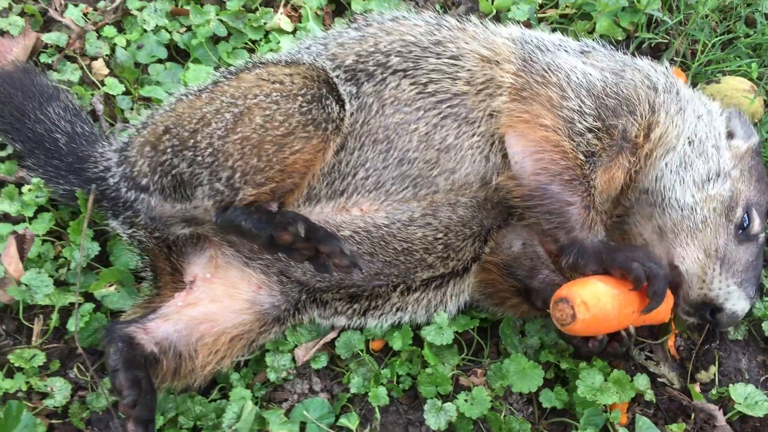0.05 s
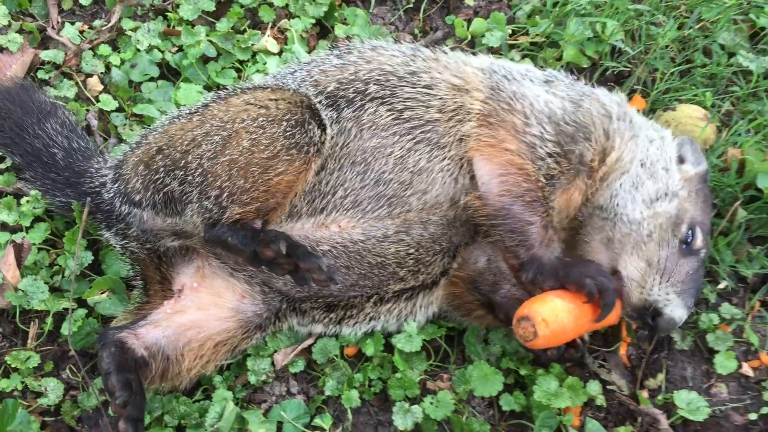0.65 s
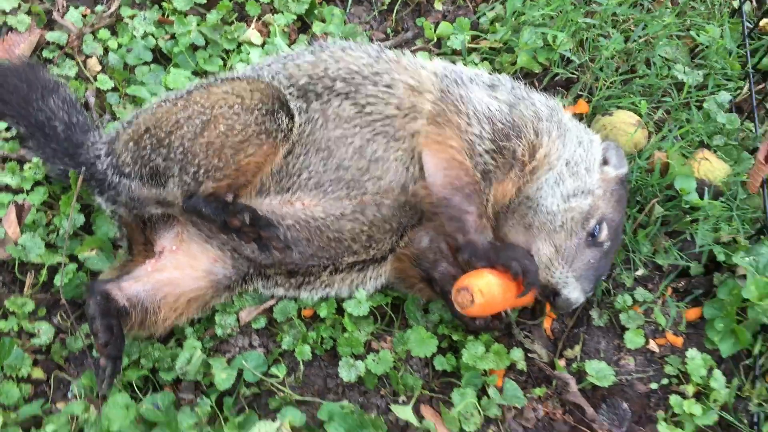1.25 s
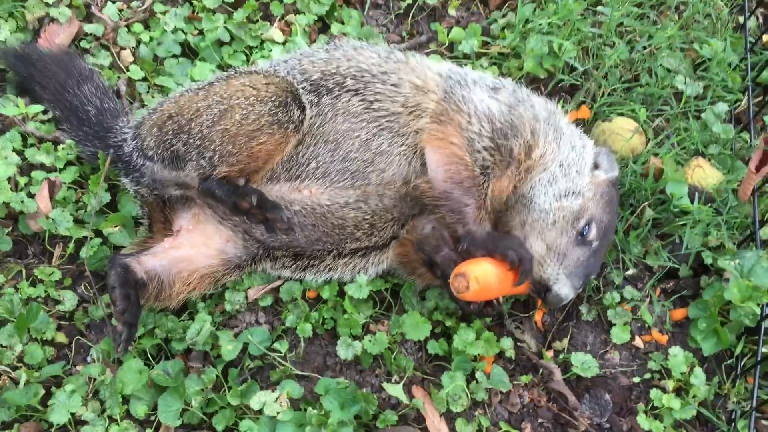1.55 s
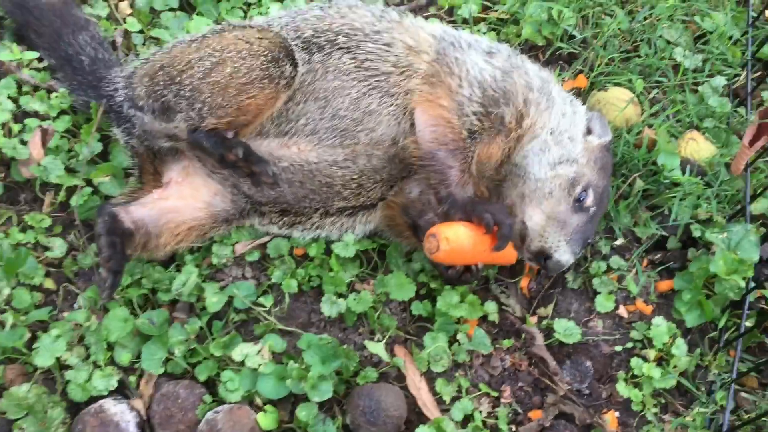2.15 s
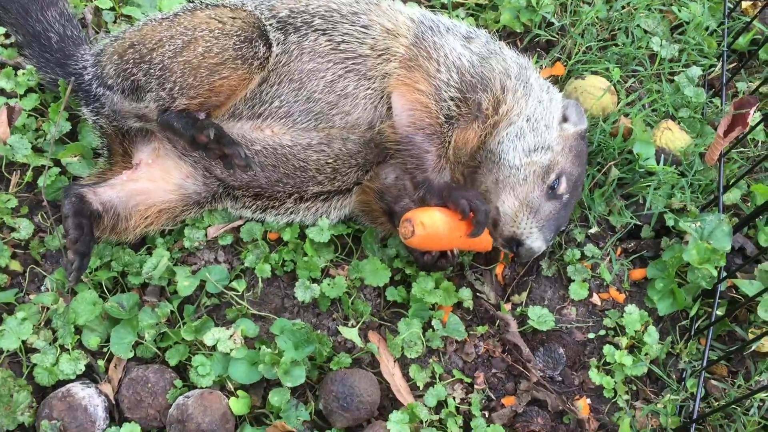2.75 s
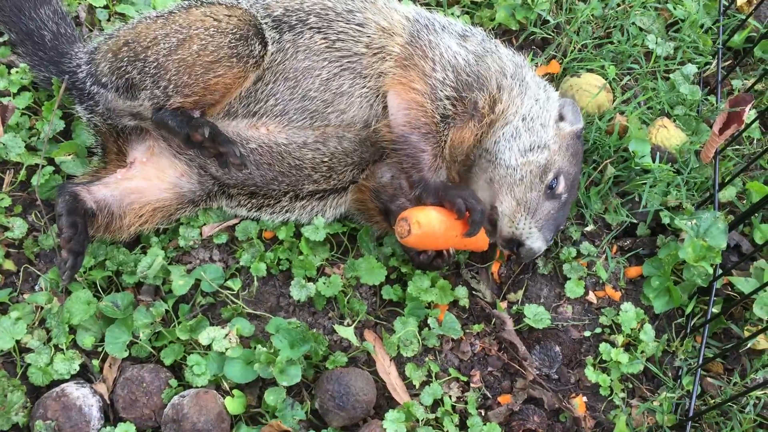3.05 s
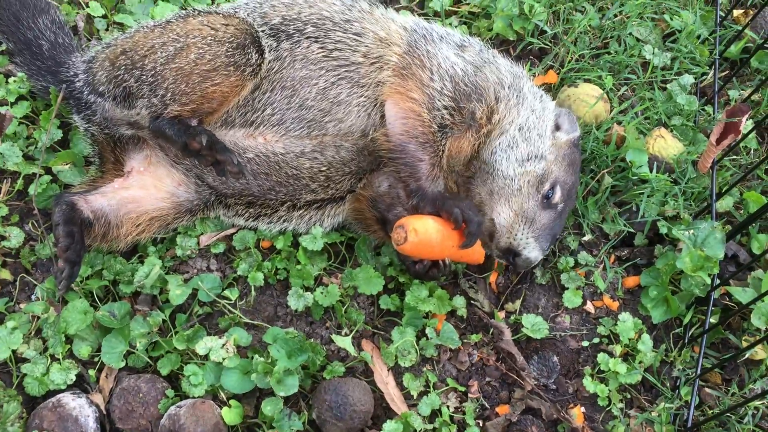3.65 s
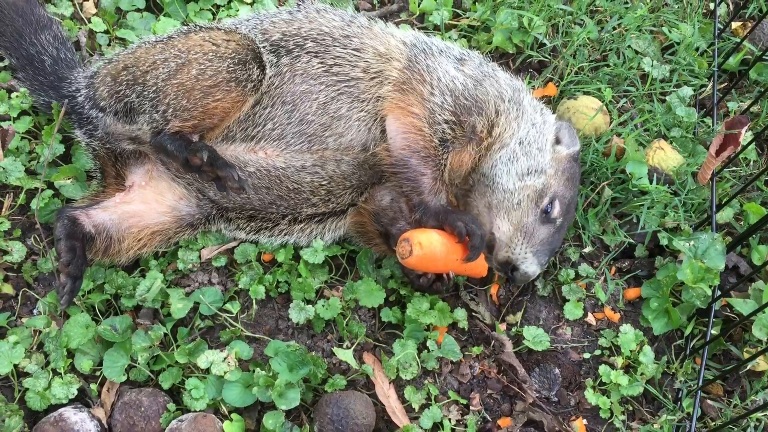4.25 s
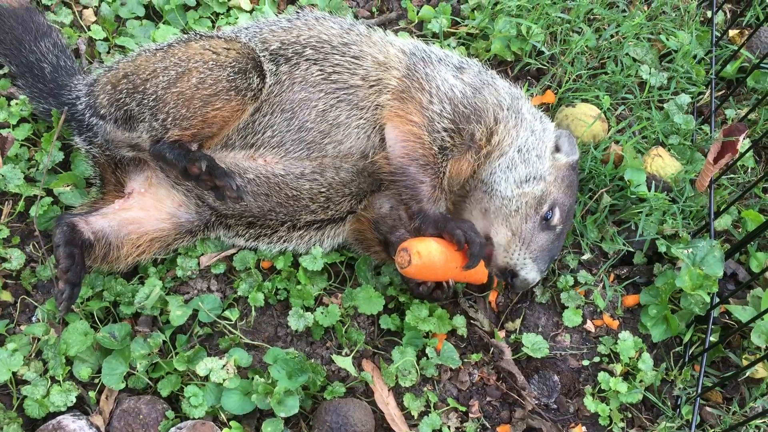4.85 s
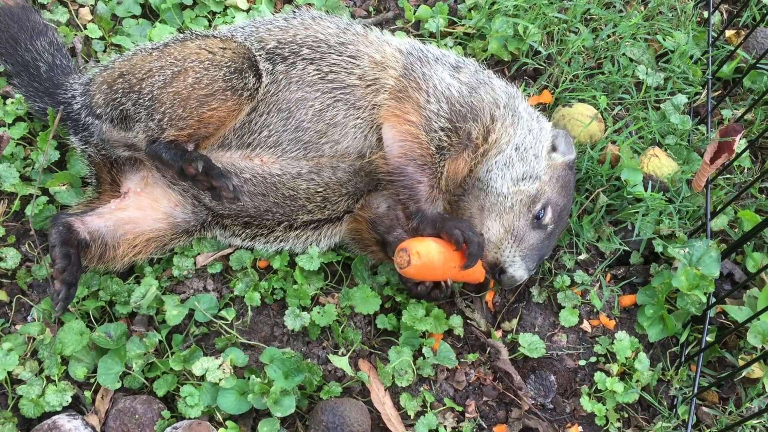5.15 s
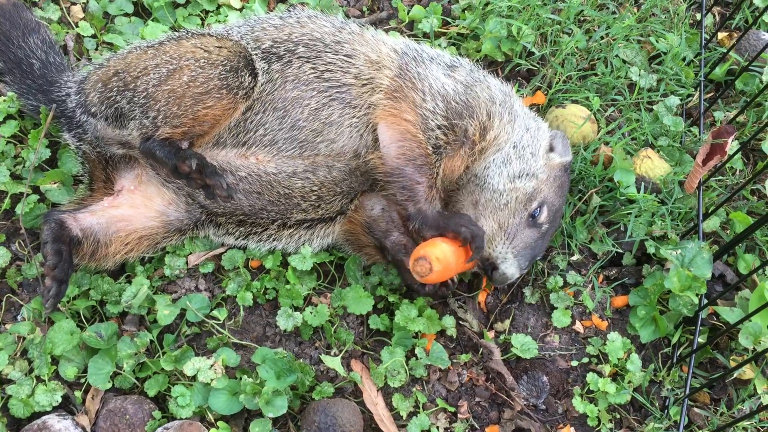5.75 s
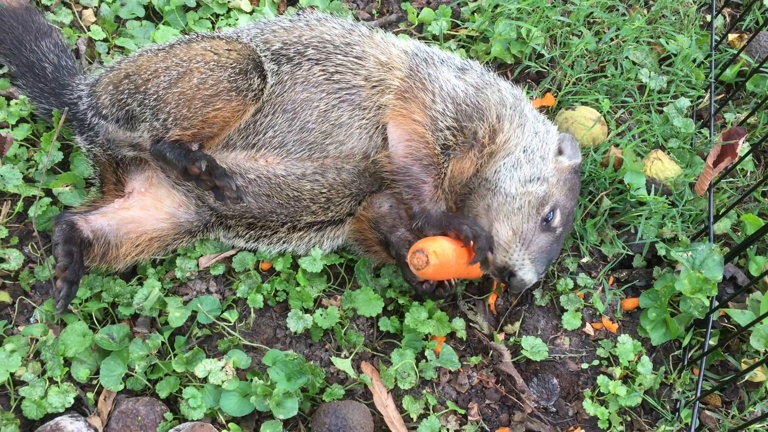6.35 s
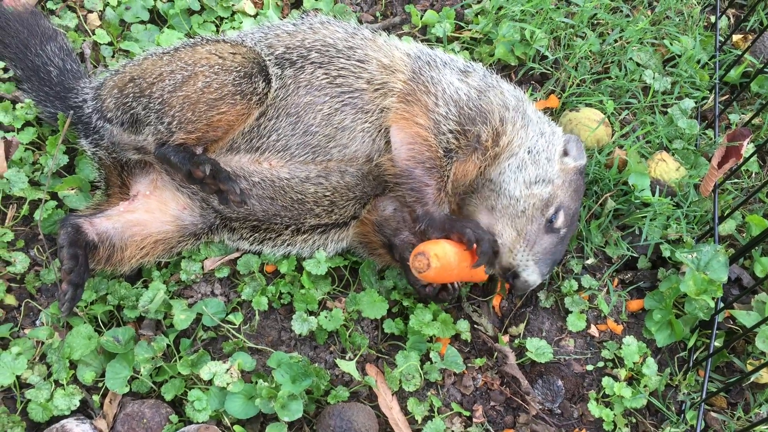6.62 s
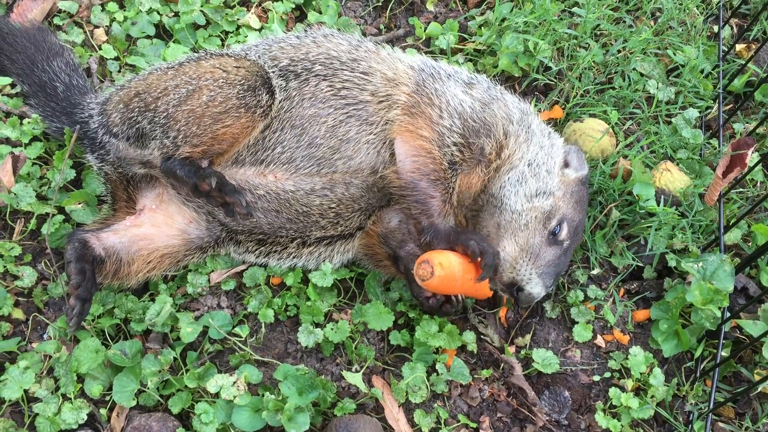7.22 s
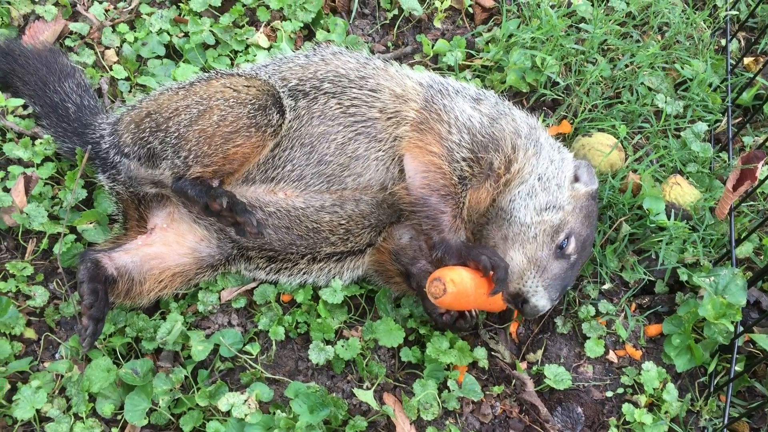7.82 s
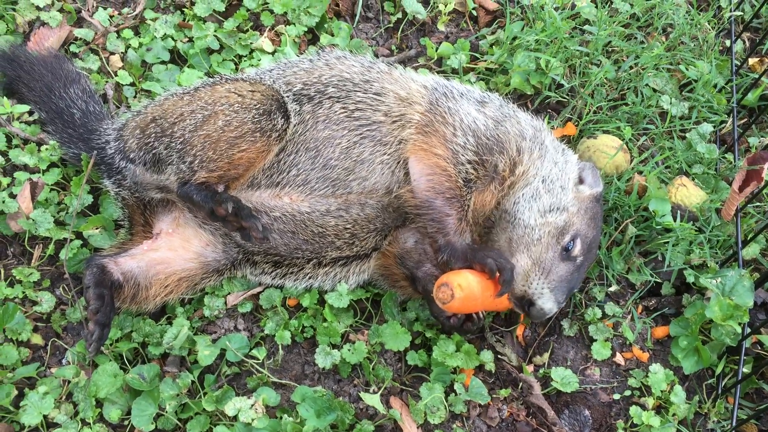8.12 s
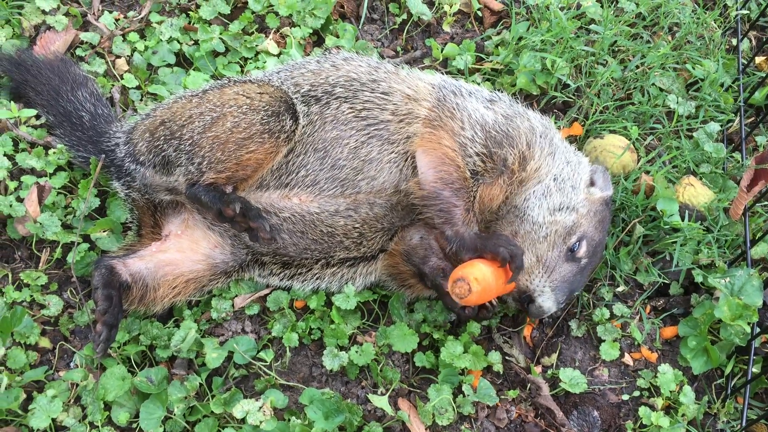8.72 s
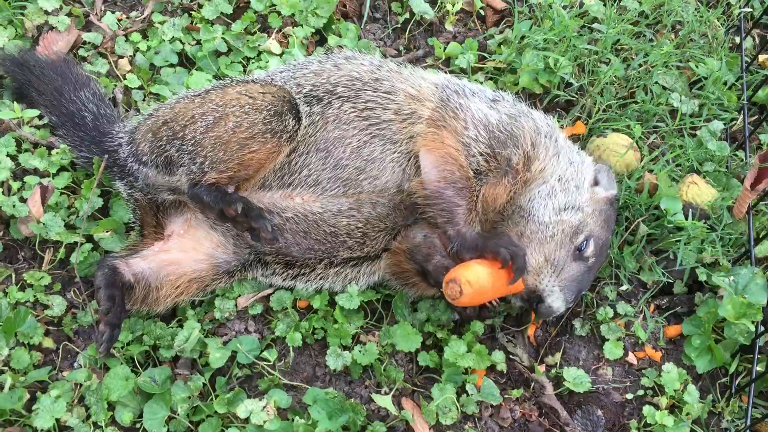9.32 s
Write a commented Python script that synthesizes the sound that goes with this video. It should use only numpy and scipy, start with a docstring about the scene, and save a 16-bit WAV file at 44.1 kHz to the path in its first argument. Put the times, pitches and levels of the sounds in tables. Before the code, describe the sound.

In a garden full of high trilling, chirping and rasping insects, light wind rumbles on a close microphone. A groundhog gnaws a raw carrot in quick, crisp little crunches. A piece snaps off, then a jay calls far away. Another piece cracks off past the middle, followed by a faint bump on the microphone. Near the end a dull bump comes with a second jay call, and a last piece snaps.

```python
"""From the start, light wind rumbles on a close microphone in a garden full of insects: one cricket trills,
two others chirp and two katydids rasp, all by rubbing their wings. A groundhog lies there, steadily
chewing a raw carrot. Near 1.7 s its front teeth crack through the flesh until a piece snaps off.
A jay calls far away at 2.8 s, and a second piece snaps off near 6.3 s. Soft bumps touch the microphone
at 6.7 s and at 8.4 s, just as the jay calls again. The third piece snaps off at 8.9 s."""
import sys
import numpy as np
from scipy import signal
from scipy.fft import rfft, irfft, next_fast_len
from scipy.io import wavfile
from scipy.ndimage import uniform_filter1d, map_coordinates

SR = 44100
rng = np.random.default_rng(int(sys.argv[2]) if len(sys.argv) > 2 else 0)


def waveform_to_disk(signal):
    """Save audio, clipped to [-1, 1], as 16-bit WAV at the path in sys.argv[1]."""
    frames = np.transpose(np.atleast_2d(signal))
    scaled = np.clip(frames, -1, 1) * 32767
    samples = np.round(scaled).astype(np.int16)
    wavfile.write(sys.argv[1], SR, samples)


N = 418062
TIME = np.arange(N) / SR


def from_db(db):
    """Turn decibels into a number to multiply a sound by."""
    return 10 ** (np.asarray(db) / 20)


def rms_one(x):
    """Scale a signal so that its average power is 1."""
    return x / np.sqrt(np.mean(x ** 2) + 1e-20)


def in_time(rows):
    """Join (time, value) points with straight lines, giving a value for every sample."""
    return np.interp(TIME, *np.transpose(rows))


def add(out, start, sound):
    """Mix a sound into out, beginning at start seconds."""
    i = int(round(start * SR))
    sound, i = sound[max(-i, 0):], max(i, 0)
    out[i:i + len(sound)] += sound[:max(N - i, 0)]


def bell(t, width):
    """A smooth swell that reaches 1 at t = 0."""
    return np.exp(-2 * (t / width) ** 2)


def drift(rate):
    """A smooth random wobble that passes through rate new values each second."""
    knots = rng.standard_normal(int(N / SR * rate) + 3)
    return rms_one(map_coordinates(knots, [TIME * rate], order=3, mode="nearest"))


def noise(colour):
    """Steady noise of power 1; its colour says how strong the low and high frequencies are."""
    hz, db = np.transpose(colour)
    size = next_fast_len(N)
    freqs = np.maximum(np.fft.rfftfreq(size, 1 / SR), 1)
    gain = from_db(np.interp(np.log(freqs), np.log(hz), db, left=-120, right=-120))
    return rms_one(irfft(rfft(rng.standard_normal(size)) * gain, size)[:N])


def beats(bouts):
    """Turn (start, end, period, ...) rows into one (time, ...) row for each beat."""
    return [(s, *rest) for start, end, period, *rest in bouts for s in np.arange(start, end, period)]


def scatter(x, decay_s, wet_db):
    """Leaves and soil throw back a short, blurred echo; wet_db sets how loud it is."""
    t = np.arange(int(6 * decay_s * SR)) / SR
    tail = rng.standard_normal(len(t)) * np.exp(-t / decay_s)
    return x + from_db(wet_db) * signal.fftconvolve(x, tail / np.linalg.norm(tail))[:N]


# how strong the wind is: (time [s], level [dB])
WIND_LEVEL = [(0.0, -52), (0.86, -48.5), (0.94, -60.5), (1.24, -48), (1.54, -55.5), (1.6, -47.5),
              (3.68, -53.0), (3.8, -57.5), (3.92, -50.5), (4.3, -57), (4.78, -47), (4.88, -61),
              (5.14, -46.5), (5.4, -52.5), (5.58, -49.5), (5.98, -56.5), (6.14, -46.5), (6.28, -56),
              (6.5, -51.0), (6.64, -67), (6.72, -49), (6.9, -56.5), (7.4, -47), (7.56, -55), (8.24, -48.5),
              (8.72, -53.5), (9.24, -47), (9.48, -53)]
# its deep colour: (frequency [Hz], relative level [dB])
WIND_COLOUR = [(20, -27), (35, -16.5), (50, -0.5), (70, 0.5), (135, 0), (200, -10), (300, -26),
               (450, -50.5), (900, -45)]


def wind(smooth_s=.12, gust_db=2, gusts_per_s=14):
    """Swirling air rumbles on the microphone, swelling, sinking and wavering in quick gusts."""
    rumble = noise(WIND_COLOUR)
    even_rumble = rumble / np.sqrt(uniform_filter1d(rumble ** 2, int(smooth_s * SR)) + 1e-9)
    return from_db(in_time(WIND_LEVEL) + gust_db * drift(gusts_per_s)) * even_rumble


# colours of the far air, the insect chorus and a thin buzz: (frequency [Hz], relative level [dB])
AIR_COLOUR = [(200, 13.5), (450, -2.5), (600, -1), (850, -2), (1300, -1), (2000, -3.5), (2900, -8),
              (3900, -7), (5000, -12), (6800, -8.5), (9700, -6), (10400, -26.5), (12000, -15), (16000, -21)]
CHORUS_COLOUR = [(6900, -22), (7400, 7.5), (8000, -3.5), (8600, 2.5), (9200, -4.5), (9700, -34.5),
                 (10200, -74)]
BUZZ_COLOUR = [(10000, -13), (12000, -12.5), (14000, -3), (15500, 4), (17000, -6)]
# how loud the air and the buzz are: (time [s], level [dB])
AIR_LEVEL = [(0, -62.5), (.7, -64.5), (2, -64.5), (5, -65.5), (9.48, -65)]
BUZZ_LEVEL = [(0, -74), (1, -68.5), (2.2, -68.5), (3.2, -69.5), (3.95, -69), (4.05, -91.5), (9.48, -100)]


def garden(chorus_db=-64, flutter_db=2.5):
    """Distant air, the blended song of many insects, and a very high buzz that drops away at 4 s."""
    air = from_db(in_time(AIR_LEVEL)) * noise(AIR_COLOUR)
    chorus = from_db(chorus_db + flutter_db * drift(60)) * noise(CHORUS_COLOUR)
    buzz = from_db(in_time(BUZZ_LEVEL) + .7 * drift(90)) * noise(BUZZ_COLOUR)
    return air + chorus + buzz


def wing_stroke(hz, length_s, fall):
    """One wing scrapes along a row of teeth on the other and slows down, so the tone falls."""
    t = np.arange(-length_s, length_s, 1 / SR)
    pitch = hz * (1 - fall * np.tanh(t / length_s))
    tone = np.sin(2 * np.pi * np.cumsum(pitch) / SR + rng.uniform(0, 2 * np.pi))
    return bell(t, length_s) * tone * signal.windows.tukey(len(t), .2)


def ground_echo(x, share, lag_s=.003442):
    """The ground returns the song a moment later, which boosts some pitches and weakens others."""
    out = x.copy()
    add(out, lag_s, share * x)
    return out


# the course of the trill: (time [s], pitch [Hz], relative level [dB])
TRILL = [(0, 7640, -59.5), (1.1, 7770, -57), (2.4, 7700, -59.5), (4.5, 7693, -58.5), (7, 7560, -61),
         (9.48, 7690, -61)]


def trilling_cricket(pairs_per_s=25.9, second_stroke_s=.0145, level_db=8):
    """Wing strokes come in quick, endless pairs; each has a small lead-in on a higher note."""
    out, s = np.zeros(N), 0
    times, pitches, levels = np.transpose(TRILL)
    while s < N / SR:
        hz = np.interp(s, times, pitches)
        gain = from_db(np.interp(s, times, levels) + level_db)
        for delay in (0, second_stroke_s):
            at = s + delay + rng.normal(0, .0005)
            add(out, at, .5 * gain * wing_stroke(hz * 1.014, length_s=.0037, fall=.031))  # lead-in
            strength = gain * from_db(rng.normal(0, 1.2))
            stroke = wing_stroke(hz * rng.normal(.995, .003), length_s=.003, fall=.035)
            add(out, at + .0065, strength * stroke)
        s += rng.normal(1, .012) / pairs_per_s
    return scatter(ground_echo(out, share=.25), decay_s=.01, wet_db=-3.5)


# the strokes of one chirp: (time from its middle [s], base pitch [Hz], relative level [dB])
CHIRP_STROKES = [(-.056, 4490, -2.5), (-.018, 4550, 1), (.021, 4590, 2), (.059, 4507, -7)]


def chirp(level_db, pitch_factor):
    """Four falling wing strokes, centred in a quarter of a second."""
    out = np.zeros(SR // 4)
    for offset, hz, stroke_db in CHIRP_STROKES:
        stroke = wing_stroke(pitch_factor * hz * rng.normal(1, .0058), length_s=.016, fall=.068)
        gain = from_db(level_db + stroke_db + rng.normal(0, 1.86))
        add(out, offset + (len(out) - len(stroke)) / SR / 2, gain * stroke)
    return out


# the near cricket's steady beat, slower for a while: (start [s], end [s], time between chirps [s])
CHIRP_BOUTS = [(-.02, 1.45, .266), (1.585, 3.6, .268), (3.769, 5.45, .308), (5.72, 9.48, .2705)]
# how loud it is: (time [s], relative level [dB])
CHIRP_LEVEL = [(0, -61.5), (.75, -55), (1.85, -62), (2.8, -59.5), (4, -60), (9.48, -61)]


def chirping_crickets(near_boost_db=3.5, far_db=-68, far_every_s=.257):
    """One cricket chirps nearby; a second, lower one keeps its own beat farther off."""
    near, far = np.zeros(N), np.zeros(N)
    for s, in beats(CHIRP_BOUTS):
        song = chirp(np.interp(s, *np.transpose(CHIRP_LEVEL)) + near_boost_db, pitch_factor=.99)
        add(near, s - len(song) / SR / 2, song)
    for s in np.arange(0, N / SR, far_every_s):
        song = chirp(far_db, pitch_factor=.96)
        add(far, s - len(song) / SR / 2, song)
    near = scatter(ground_echo(near, share=.44), decay_s=.031, wet_db=-3)
    return near + scatter(far, decay_s=.097, wet_db=4.5)


def bursting_cells(count, per_s, spread_db):
    """Carrot cells break: tiny clicks at random moments, of very unequal size."""
    sizes = from_db(spread_db * np.minimum(rng.exponential(1, count), 4))
    signs = rng.choice([-1, 1], count)
    return rms_one(sizes * signs * (rng.random(count) < per_s / SR))


def resonate(x, hz, width):
    """Make a signal ring at one pitch; the smaller the width, the longer it rings."""
    r = np.exp(-np.pi * width / SR)
    feedback = [1, -2 * r * np.cos(2 * np.pi * hz / SR), r * r]
    return signal.lfilter([(1 - r * r) / 2, 0, (r * r - 1) / 2], feedback, x + 1e-18)


# how carrot and jaw ring, in a low body, a higher crack and a top fizz:
# (pitch [Hz], width [Hz], relative level [dB])
BODY_RINGS = [(720, 73, 1), (1270, 240, 0.5), (1720, 120, -1.5), (2300, 100, -7)]
CRACK_RINGS = [(3450, 280, 0.3), (4080, 300, 6), (5360, 360, 0.8), (5870, 380, -1)]
FIZZ_RINGS = [(8120, 430, 0), (9580, 1300, -4.5), (11200, 410, -3), (12270, 1300, -4.5),
              (15000, 1700, -4.5)]


def carrot(force, length_s, tone, body_width_hz, crack_width_hz, grip_db):
    """Breaking cells make carrot and jaw ring; the grip adds one body ring and one crack ring."""
    body_hz, body_db, crack_hz, crack_db, fizz_db = tone
    bands = [(BODY_RINGS + [(body_hz, body_width_hz, grip_db)], body_db, [480, 2700]),
             (CRACK_RINGS + [(crack_hz, crack_width_hz, grip_db)], crack_db, [2700, 7000]),
             (FIZZ_RINGS, fizz_db, [6500, 16500])]
    out = 0
    forces = np.broadcast_to(force, (len(bands), force.shape[-1]))  # one shared, or one for each band
    for (rings, level_db, edges_hz), push in zip(bands, forces):
        ringing = sum(from_db(db) * resonate(push, hz, width) for hz, width, db in rings)
        ringing = signal.sosfilt(signal.butter(2, edges_hz, "band", fs=SR, output="sos"), ringing)
        # give it the energy of a steady sound at level_db that lasts length_s
        out = out + from_db(level_db) * ringing * np.sqrt(length_s * SR) / np.linalg.norm(ringing)
    return out


# the carrot cracks: (time [s], fade time [s], body pitch [Hz], body level [dB],
# crack pitch [Hz], crack level [dB], fizz level [dB])
SNAPS = [(0.078, 0.0007, 1870, -72, 6200, -51.5, -54.5), (1.574, 0.00273, 1840, -45, 3450, -47, -47.5),
         (1.6884, 0.00042, 2300, -37.5, 3170, -34, -25), (2.1994, 0.000325, 1210, -75, 3300, -47.5, -48),
         (3.5119, 0.0015, 1150, -57, 4130, -80, -79), (4.2907, 0.0021, 1030, -79, 4100, -56.5, -81),
         (4.5954, 0.0058, 860, -53, 4110, -65, -54.5), (6.111, 0.0029, 1640, -48, 3550, -49.5, -48.5),
         (6.154, 0.0035, 1630, -45.5, 3220, -50, -43.5), (6.2667, 0.0013, 1180, -33, 4240, -28, -28),
         (6.7935, 0.003, 1540, -50.5, 4080, -58, -62), (7.2626, 0.0019, 1180, -60.5, 3240, -53.5, -62),
         (7.3883, 0.00061, 710, -85, 6200, -53, -57), (8.9039, 0.0034, 1570, -45, 4114, -38.5, -34),
         (8.9911, 0.00217, 1360, -52, 4137, -52.5, -40)]
# the front teeth bear down and the flesh splinters: (start [s], end [s])
BITES = [(1.612, 1.68), (6.202, 6.265)]
# a splinter: (body pitch [Hz], body level [dB], crack pitch [Hz], crack level [dB], fizz level [dB])
SPLINTER_TONE = (1500, -65, 4500, -61.5, -49)


def snaps(splinter_every_s=.03, splinter_fade_s=.00071, knock_hz=660, knock_s=.0007, hard_db=-40):
    """A break runs through the cells and dies in milliseconds; splinters lead up to two big ones."""
    out, t = np.zeros(N), np.arange(SR // 25) / SR
    knock = -np.sin(2 * np.pi * knock_hz * t) * t / knock_s * np.exp(1 - t / knock_s)
    splinters = beats([(start, end, splinter_every_s, splinter_fade_s, *SPLINTER_TONE)
                       for start, end in BITES])
    for s, fade_s, *tone in SNAPS + splinters:
        force = bursting_cells(len(t), per_s=16000, spread_db=4) * np.exp(-t / fade_s)
        force[0] += 1.6  # the sharp click that starts the break
        crack = carrot(force, .005, tone, body_width_hz=260, crack_width_hz=280, grip_db=7)
        # only a hard break jolts the whole carrot into a low knock
        body_db = tone[1]
        jolt = 1 / (.5 + np.exp(hard_db - body_db))
        add(out, s, crack + jolt * from_db(body_db - 2) * knock)
    return out


# two katydids, each pausing once: (start [s], end [s], time between rasps [s], pitch [Hz])
RASP_BOUTS = [(.149, 6, .404, 9170), (6.69, 9.48, .402, 9200), (.36, 5.6, .458, 8530),
              (6.48, 9.48, .424, 8550)]


def katydids(level_db=-61.5, uneven_db=1.5, length_s=.05, teeth_per_s=110, arch=.016):
    """Wing teeth pulse a thin, rough tone whose pitch arches up and back down."""
    out, t = np.zeros(N), np.arange(-1.5 * length_s, 1.5 * length_s, 1 / SR)
    pulses = 1 + np.sin(2 * np.pi * teeth_per_s * t)
    for s, hz in beats(RASP_BOUTS):
        waver = .012 * rms_one(uniform_filter1d(rng.standard_normal(len(t)), size=50))
        pitch = hz * (1 - arch * (t / length_s) ** 2 + waver)
        rasp = rms_one(pulses * np.sin(2 * np.pi * np.cumsum(pitch) / SR))
        add(out, s + t[0], from_db(level_db + rng.normal(0, uneven_db)) * rasp * bell(t, length_s))
    return scatter(out, decay_s=.01, wet_db=-6)


# the strong chews, with relative levels: (middle time [s], length [s], body pitch [Hz],
# body level [dB], crack pitch [Hz], crack level [dB], fizz level [dB])
STRONG_CHEWS = [(0.172, 0.07, 1250, -72, 3230, -70.5, -88), (0.384, 0.032, 1670, -83, 6300, -61.5, -74),
                (0.66, 0.012, 2040, -68, 3360, -66, -80), (0.879, 0.06, 880, -81, 3970, -73, -65.5),
                (1.242, 0.05, 766, -84, 6700, -71, -69.5), (1.504, 0.03, 1470, -57.5, 6150, -61, -60),
                (1.528, 0.0065, 1170, -44.5, 6160, -44, -35.5),
                (2.198, 0.048, 705, -79, 3480, -60.5, -56.5), (2.39, 0.062, 1430, -70, 6300, -71, -79),
                (2.989, 0.032, 1690, -74, 6160, -53, -71.5), (3.244, 0.036, 1080, -70, 6530, -67, -73.5),
                (3.471, 0.033, 1290, -78, 3250, -72, -59), (3.696, 0.038, 810, -65, 6360, -60.5, -59),
                (4.137, 0.044, 790, -85, 6245, -66.5, -66), (4.372, 0.013, 1210, -63.5, 6620, -72, -73),
                (4.554, 0.015, 1860, -75, 6630, -67, -59), (4.811, 0.04, 1420, -71.5, 6200, -80, -80),
                (5.096, 0.011, 1330, -64, 3602, -57.5, -58), (5.798, 0.034, 1290, -65.5, 6570, -58.5, -61),
                (6.033, 0.064, 1530, -64, 4000, -61.5, -63.5),
                (6.777, 0.036, 1513, -69, 3590, -62.5, -60.5), (7.004, 0.026, 1674, -62.5, 5550, -65, -62),
                (7.227, 0.039, 1670, -82, 6450, -65.5, -62), (7.674, 0.059, 1550, -76, 6200, -68, -69),
                (7.825, 0.0437, 974, -76, 4240, -76, -71), (8.126, 0.036, 1830, -76, 3510, -66, -76.5),
                (8.361, 0.015, 1830, -57.5, 3380, -70, -74), (8.549, 0.0156, 2340, -72.5, 5940, -62, -72),
                (8.789, 0.049, 1770, -65, 4130, -63, -65), (9.393, 0.054, 1160, -63.5, 4240, -59, -61.5)]


def chews(level_db=3.5, juice_cutoff_hz=12500):
    """Each stroke of the teeth bursts a swelling, fading cloud of cells; juice dulls the very top."""
    out = np.zeros(N)
    for s, length_s, *tone in STRONG_CHEWS + soft_chews():
        t = np.arange(-2 * length_s, 2 * length_s, 1 / SR)
        # large, medium and small cells burst separately, feeding body, crack and fizz
        cells = np.array([bursting_cells(len(t), per_s, spread_db=4.5) for per_s in (900, 1200, 2200)])
        force = cells / np.cosh(2 * t / length_s) ** 1.535
        crunch = carrot(force, length_s, tone, body_width_hz=70, crack_width_hz=170, grip_db=12)
        add(out, s + t[0], crunch)
    return from_db(level_db) * signal.sosfilt(signal.butter(2, juice_cutoff_hz, fs=SR, output="sos"), out)


# a typical soft chew, with relative levels:
# (body pitch [Hz], body level [dB], crack pitch [Hz], crack level [dB], fizz level [dB])
SOFT_CHEW_TONE = (1356, -73.5, 3402, -73, -78)


def soft_chews(start_s=.19, every_s=.218, length_s=.018, uneven_db=3.5, squeak_share=.4, squeak_hz=6200):
    """Rows for chews(): the jaw keeps working, no two strokes are alike, and some squeak higher."""
    body_hz, body_db, crack_hz, crack_db, fizz_db = SOFT_CHEW_TONE
    times = np.arange(start_s, N / SR, every_s)
    chance = rng.standard_normal((len(times), 5))
    squeaks = rng.random(len(times)) < squeak_share
    return [(s + .015 * late, length_s,
             body_hz * np.exp(.2 * grip), body_db + uneven_db * low,
             squeak_hz if squeak else crack_hz, crack_db + uneven_db * mid,
             fizz_db + uneven_db * high)
            for s, squeak, (late, grip, low, mid, high) in zip(times, squeaks, chance)]


# the jay's calls: (middle time [s], base pitch [Hz], level [dB])
JAY_CALLS = [(2.809, 834, -56.5), (8.35, 834, -59)]
# the overtones of its voice: (multiple of the base pitch, relative level [dB])
JAY_OVERTONES = [(3, -10), (4, 1.5), (5, -8), (6, -14), (7, -8), (8, -4.5)]


def jay(length_s=.1, fall_per_s=.14, roughness=.028):
    """A nasal, slightly falling cry that turns hoarse, blurred by the trees."""
    out, rasp = np.zeros(N), roughness * drift(300)
    for s, hz, db in JAY_CALLS:
        from_middle = np.clip(TIME - s, -length_s, length_s)
        hoarse = .5 + .5 * from_middle / length_s
        pitch = hz * (1 + hoarse * rasp - fall_per_s * from_middle)
        phase = 2 * np.pi * np.cumsum(pitch) / SR
        voice = sum(from_db(tone_db) * np.sin(multiple * phase) for multiple, tone_db in JAY_OVERTONES)
        out += from_db(db) * bell(TIME - s, length_s) * voice
    return scatter(out, decay_s=.15, wet_db=-1)


# soft bumps on the microphone: (time [s], pitch [Hz], level [dB])
BUMPS = [(6.714, 118, -57), (8.432, 252.4, -37.5), (8.441, 100, -40)]


def microphone_bumps():
    """Dull knocks that die away within a few vibrations."""
    out, t = np.zeros(N), np.arange(SR // 10) / SR
    for s, hz, db in BUMPS:
        cycles = t * hz
        swell = 2 * cycles * np.exp(1 - 2 * cycles)
        add(out, s, from_db(db) * swell * np.sin(2 * np.pi * cycles))
    return out


def scene():
    """The close gnawing and the garden around it, mixed into one channel."""
    gnawing = scatter(snaps() + chews(), decay_s=.009, wet_db=-14)
    insects = trilling_cricket() + chirping_crickets() + katydids()
    return (gnawing + insects + jay() + garden() + wind() + microphone_bumps())[None]


def record(dry):
    """The very highest treble is cut off steeply."""
    cutoff_hz = 15900
    return signal.sosfilt(signal.ellip(10, .1, 70, cutoff_hz, fs=SR, output="sos"), dry)


dry = scene()
out = record(dry)
waveform_to_disk(out)
```